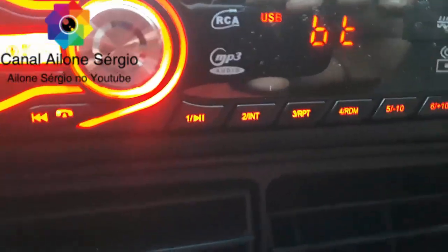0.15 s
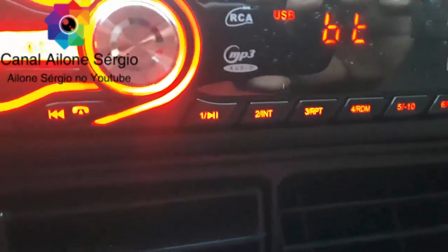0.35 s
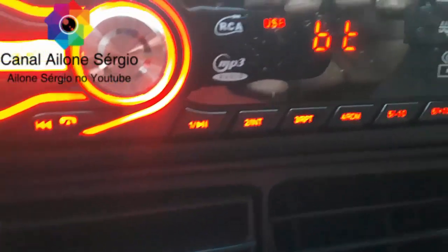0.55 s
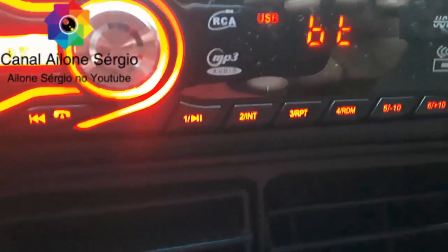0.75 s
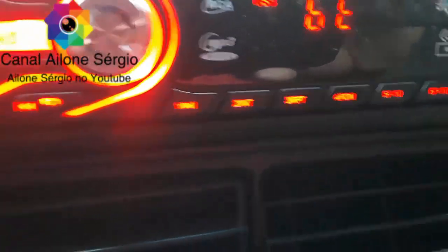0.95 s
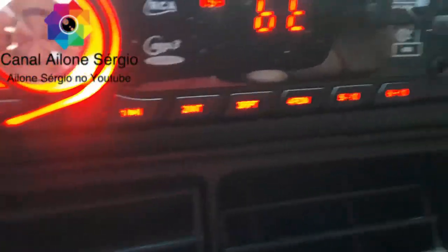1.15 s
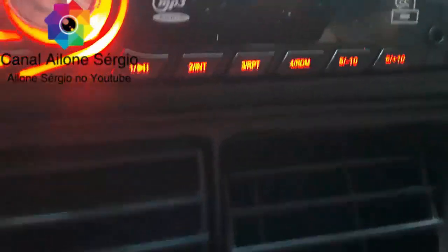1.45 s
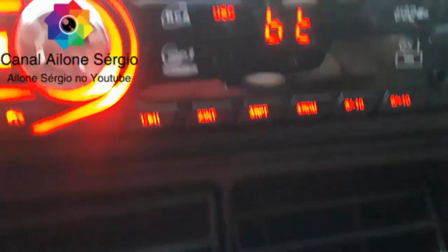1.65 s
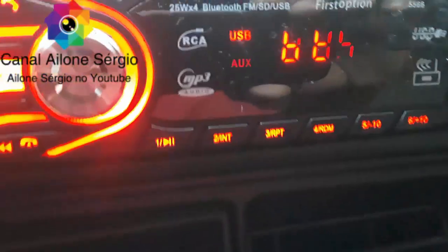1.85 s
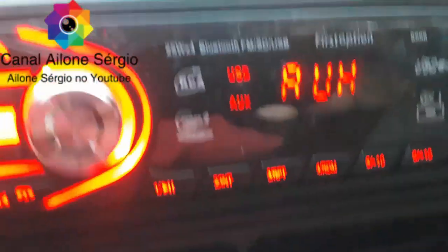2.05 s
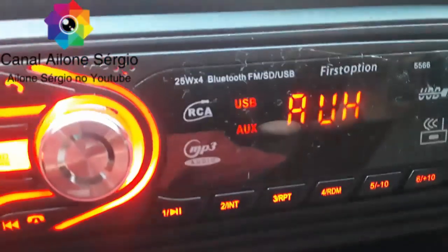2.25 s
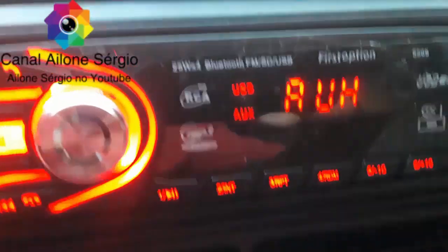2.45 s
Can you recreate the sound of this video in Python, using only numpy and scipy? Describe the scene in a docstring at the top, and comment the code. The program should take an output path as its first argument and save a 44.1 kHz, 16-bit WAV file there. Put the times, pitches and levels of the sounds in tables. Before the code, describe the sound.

A plastic push-button on a car stereo snaps in with a sharp, bright click at about 0.25 seconds and springs back with a second click at 0.5, each ringing very briefly in the small cabin. A barely audible brush and bump of handling come around 1.1 to 1.2 seconds, then a much softer click at 1.6. A faint low cabin rumble and hiss run throughout.

```python
"""A low cabin rumble and microphone hiss run throughout. A plastic push-button on a car stereo snaps in
and, a quarter second later, springs back. Each snap rings the faceplate, the switch dome cracks, the cap
rattles in its guide for a few milliseconds, and the small cabin answers briefly. Two very faint handling
noises follow, a brush and a bump; then comes a softer click, about a second after the release."""
import sys
import numpy as np
from scipy import signal
from scipy.io import wavfile

SR = 44100
rng = np.random.default_rng(int(sys.argv[2]) if len(sys.argv) > 2 else 0)


def transcribe(signal):
    """Save signal, clipped to [-1, 1], as a 16-bit WAV file at the path in sys.argv[1]."""
    frames = np.atleast_2d(signal).T
    limited = np.clip(frames, -1, 1)
    pcm = np.round(limited * 32767).astype(np.int16)
    wavfile.write(sys.argv[1], SR, pcm)


N = 114660

# Tone of the rumble and hiss: f/Hz, relative level per Hz/dB
BED_SPECTRUM = [(13, -49), (22, -19.5), (42, -8), (86, -1), (145, -7.5), (212, -18), (366, -18.5),
                (408, -24), (522, -17.5), (567, -22), (926, -23.5), (1250, -25.5), (7790, -29.5),
                (12700, -26), (15000, -26.5)]
# Stereo width of that bed: f/Hz, side level against mid/dB
BED_WIDTH = [(60, -12), (120, -15.5), (240, -10.5), (480, -8), (950, -6), (1890, -4), (3770, -2.5),
             (7520, 0), (15000, -2)]
# Cues for press, release and soft click: t/s, rattle delay/s, rattle length/s, rattle level/dB,
# cabin level/dB, stretch factor on the cabin's early decay, crack level/dB
SNAPS = [(0.2457, 0.00014, 0.0033, -19.5, -29, 0.86, -9), (0.4991, 0.00077, 0.0034, -25.5, -29, 0.87, -24),
         (1.5749, 0.0001, 0.0059, -39.5, -44, 1, -37.5)]
# Faceplate and switch modes: f/Hz, t60/s, level/dB (before the bass cut) on press, release, soft click
PANEL_MODES = [(649, 0.057, -47, -41, -77), (779, 0.049, -39, -42, -79), (883.4, .14, -52, -42.5, -80),
               (941, 0.11, -54.5, -45, -59), (1020, .15, -51.5, -46, -70), (1127, 0.17, -46.5, -47, -74),
               (1398, .045, -39.5, -40.5, -40), (1475, .07, -49, -41, -42), (1596, 0.056, -37.5, -35, -47),
               (1919, 0.081, -32, -33.5, -51), (2130, .04, -39.5, -30, -44.5),
               (2300, 0.07, -43.5, -50.5, -60), (2474, .065, -37, -36, -74), (3400, 0.029, -34, -37.5, -41),
               (3856, 0.021, -31, -25.5, -36), (3865, .085, -35, -46, -58), (4430, .03, -34, -36, -49.5),
               (4536, .025, -23, -32.5, -62), (5070, .034, -31.5, -39.5, -50),
               (5500, .028, -27.5, -57, -53), (5890, 0.029, -29, -38, -54.5),
               (7966, 0.007, -33, -29, -58.5), (8250, 0.063, -44.5, -42.5, -77),
               (13100, .011, -31, -46, -72)]
# Colour of the cap's rattle: f/Hz, relative level per Hz/dB on press, release, soft click
RATTLE_SPECTRA = [(40, -36.5, -47, -26), (363, -29, -43.5, -20), (550, -16, -21.5, -29),
                  (740, -7.5, -3.5, -18), (1001, -11, -2.5, -24), (1480, -7.5, 0, -1),
                  (2150, -2.5, 3.5, -7), (2908, -9.5, -10, -5.5), (3660, 0, -3, 3.5),
                  (5222, -1, -15.5, -11.5), (7430, -7.5, -6, -28), (10400, -12.5, -20.5, -27),
                  (13100, -12, -10, -25), (15600, -30.5, -26.5, -38)]
# Colour of the cabin's answer: f/Hz, relative level per Hz/dB on press, release, soft click
CABIN_SPECTRA = [(40.32, -32.5, -26.5, -39), (280, -20.5, -7, -16), (416.3, -23.5, -13.5, -7),
                 (648.4, -4, -1, -9.5), (1200, -5.5, 0, -3), (1690, -2, 3.5, -1.5), (2391, -1.5, 1.5, -6),
                 (2859, -8.5, -8.5, -3), (3700, -1, -6, -4), (5220, -4, -7, -16),
                 (7550, -11.5, -9.5, -13.5), (10380, -13.5, -19, -24), (13340, -12, -17.5, -19),
                 (16120, -26, -37, -36)]
# Early decay of the cabin, before each snap's stretch: f/Hz, t60/s
CABIN_DECAY = [(150, .16), (500, .12), (1000, .13), (2200, 0.12), (4000, 0.097), (8000, .07), (14000, .06)]
# A brush and a bump: t/s, rise/s, t60/s, centre f/Hz, bandwidth/Hz, level/dB
HANDLING_CUES = [(1.086, 0.022, 0.34, 3930, 330, -70.5), (1.217, 0.01, 0.081, 382, 110, -61)]

BED_DB, BED_WAVER_DB, HISS_TOP_HZ, TREBLE_CUT_HZ = -66, 1.1, 14900, 15900
PANEL_BASS_CUT_HZ, CAP_MODES_ABOVE_HZ = 480, 3000
DRIVEN_SHARE = 0.93  # modes hold their level for this share of the rattle's length
CABIN_DELAY_S = .003
BAND_EDGES_HZ = np.geomspace(20, 16500, 30)
AGE = np.arange(int(.4 * SR)) / SR  # seconds into a one-shot


def from_db(db):
    """Decibels to gain."""
    return 10 ** (np.asarray(db) / 20)


def unit_rms(x):
    """Scale to an rms of one."""
    return x / np.sqrt(np.mean(x ** 2) + 1e-20)


def at_hz(curve, hz):
    """Read a curve on a log-frequency axis."""
    freqs, values = np.transpose(curve)
    return np.interp(np.log(hz), np.log(freqs), values)


def decay(age, t60):
    """Full level until age zero, then 60 dB down every t60."""
    return np.exp(-np.log(1000) * np.maximum(age, 0) / t60)


def add(out, start_s, sound):
    """Drop a sound into the mix; mono sits in the centre."""
    i = int(start_s * SR)
    out[:, i:i + sound.shape[-1]] += sound[..., :N - i]


def low_pass(x, hz):
    """Steep treble cut."""
    return signal.sosfilt(signal.ellip(10, .2, 70, hz, fs=SR, output="sos"), x)


def band_noise(low, high, size):
    """Steady noise between two frequencies, rms one."""
    sos = signal.butter(2, [low, high], "band", fs=SR, output="sos")
    white = rng.standard_normal(size + len(AGE))  # pre-roll lets the filter settle
    return unit_rms(signal.sosfilt(sos, white)[-size:])


def bands(spectrum):
    """Third-octave bands as (low, high, centre, gain), their powers summing to one."""
    centres = np.sqrt(BAND_EDGES_HZ[1:] * BAND_EDGES_HZ[:-1])
    gains = from_db(at_hz(spectrum, centres)) * np.sqrt(np.diff(BAND_EDGES_HZ))
    return zip(BAND_EDGES_HZ, BAND_EDGES_HZ[1:], centres, gains / np.linalg.norm(gains))


def burst(low, high, envelope):
    """A band of noise under an envelope, carrying just that envelope's energy."""
    noise = band_noise(low, high, size=len(AGE)) * envelope
    return noise * np.linalg.norm(envelope) / np.linalg.norm(noise)


def rumble_and_hiss():
    """The bed: low cabin rumble and even microphone hiss, each band wavering slightly."""
    bed = 0
    for low, high, hz, gain in bands(BED_SPECTRUM):
        waver = from_db(BED_WAVER_DB * band_noise(2, 6.7, size=N))
        side = from_db(at_hz(BED_WIDTH, hz)) * band_noise(low, high, size=N)
        mid = band_noise(low, high, size=N)
        bed = bed + gain * waver * (mid + side * [[1], [-1]])
    return from_db(BED_DB) * unit_rms(low_pass(bed, HISS_TOP_HZ))


def faceplate_ring(snap, rattle_delay, rattle_length):
    """The snap sets the modes ringing, with strengths that depend on where it lands."""
    ring = 0
    for k, (hz, t60, *levels_db) in enumerate(PANEL_MODES):
        onset = rattle_delay if hz > CAP_MODES_ABOVE_HZ else 0  # the cap's modes start with its rattle
        age = np.maximum(AGE - onset, 0)
        polarity = (-1) ** (k // 2)
        envelope = decay(age - DRIVEN_SHARE * rattle_length, t60)
        ring = ring + polarity * from_db(levels_db[snap]) * np.sin(2 * np.pi * hz * age) * envelope
    return ring


def cut_bass(x):
    """Take away the bass, so the ring and the tick sound thin and bright."""
    return signal.sosfilt(signal.butter(2, PANEL_BASS_CUT_HZ, "high", fs=SR, output="sos"), x)


def dome_crack(hz=4830, t60=.004):
    """The metal dome of the switch flips: a hard, bright tick, gone at once."""
    return np.sin(2 * np.pi * hz * AGE) * decay(AGE, t60)


def cap_rattle(spectrum, length, t60=0.012):
    """The cap chatters in its guide, too fast to tell the touches apart, then stops."""
    envelope = decay(AGE - length, t60)
    return sum(gain * burst(low, high, envelope) for low, high, _, gain in bands(spectrum))


def dashboard_thud(hz=108, t60=0.028, relative_db=-26):
    """The push nudges the dashboard: a small, heavily damped knock under the rattle."""
    return from_db(relative_db) * np.sin(2 * np.pi * hz * AGE) * decay(AGE, t60)


def cabin_reflections(spectrum, stretch, build_s=.0015, tail_db=-33.5, tail_t60=0.27, side_db=-39.5):
    """Dense reflections off dashboard and windows; the treble dies first, over a faint slower tail."""
    build = 1 - np.exp(-AGE / build_s)
    tail = from_db(tail_db) * decay(AGE, tail_t60)
    reverb = 0
    for low, high, hz, gain in bands(spectrum):
        early = decay(AGE, stretch * at_hz(CABIN_DECAY, hz))
        envelope = build * np.hypot(early, tail)
        side = from_db(side_db) * burst(low, high, envelope)
        mid = burst(low, high, envelope)
        reverb = reverb + gain * (mid + side * [[1], [-1]])
    return reverb


def airy_tail(low_hz=3505, t60=.55, relative_db=-35.5):
    """A trace of bright hiss that outlasts the cabin's answer."""
    return from_db(relative_db) * burst(low_hz, TREBLE_CUT_HZ, decay(AGE, t60))


def handling_noise(rise, t60, hz, width_hz):
    """A soft narrow-band rub that swells and fades."""
    envelope = np.minimum(AGE / rise, 1) * decay(AGE - rise, t60)
    return burst(hz - width_hz / 2, hz + width_hz / 2, envelope)


def scene():
    """Three layered clicks dead centre and two handling noises, over the quiet bed."""
    out = rumble_and_hiss()
    for snap, (t, delay, length, rattle_db, cabin_db, stretch, crack_db) in enumerate(SNAPS):
        rattle_colour = [(hz, levels_db[snap]) for hz, *levels_db in RATTLE_SPECTRA]
        cabin_colour = [(hz, levels_db[snap]) for hz, *levels_db in CABIN_SPECTRA]
        body = cap_rattle(rattle_colour, length) + dashboard_thud()
        answer = cabin_reflections(cabin_colour, stretch) + airy_tail()
        add(out, t, cut_bass(faceplate_ring(snap, delay, length)))
        add(out, t + delay, from_db(crack_db) * cut_bass(dome_crack()))
        add(out, t + delay, from_db(rattle_db) * body)
        add(out, t + CABIN_DELAY_S, from_db(cabin_db) * answer)
    for t, rise, t60, hz, width_hz, level_db in HANDLING_CUES:
        add(out, t, from_db(level_db) * handling_noise(rise, t60, hz, width_hz))
    return out


def record(dry):
    """Trim the very top of the treble off the mix."""
    return low_pass(dry, TREBLE_CUT_HZ)


dry = scene()
out = record(dry)
transcribe(out)
```